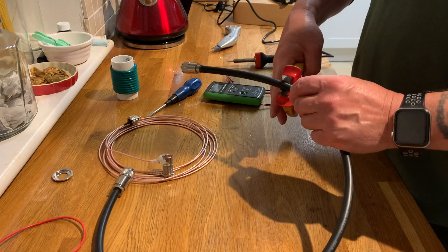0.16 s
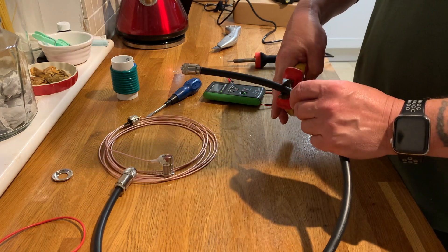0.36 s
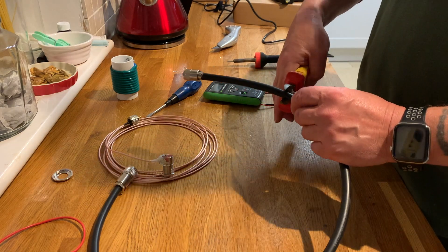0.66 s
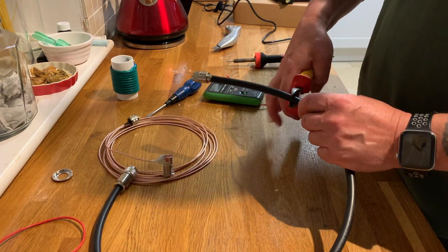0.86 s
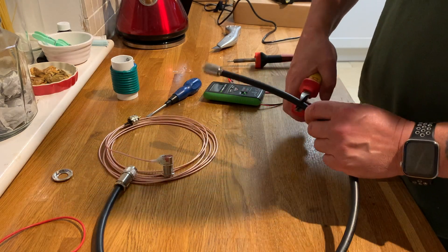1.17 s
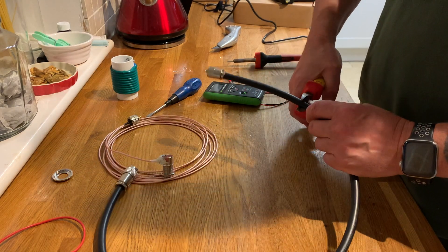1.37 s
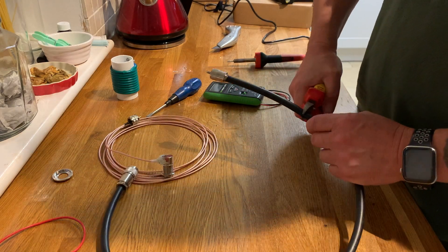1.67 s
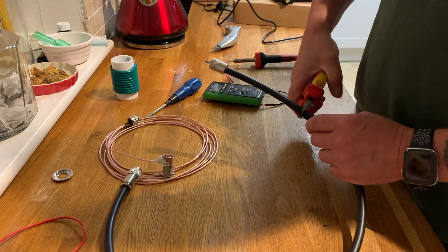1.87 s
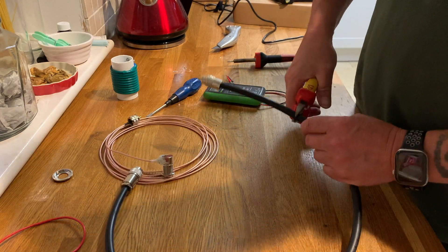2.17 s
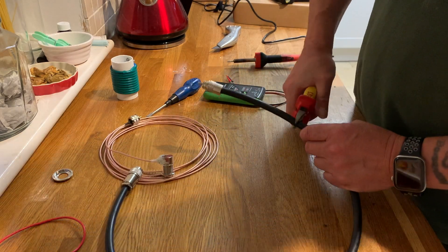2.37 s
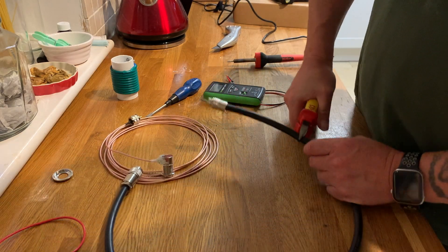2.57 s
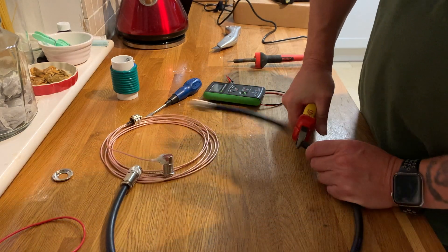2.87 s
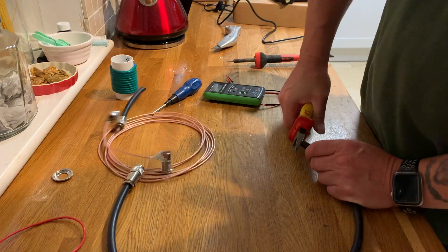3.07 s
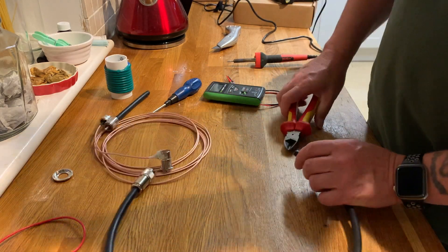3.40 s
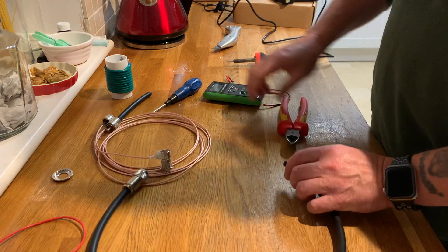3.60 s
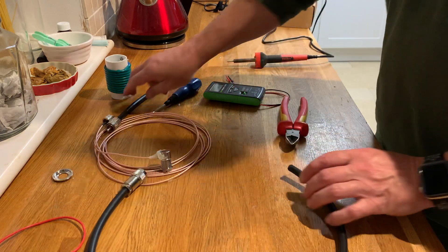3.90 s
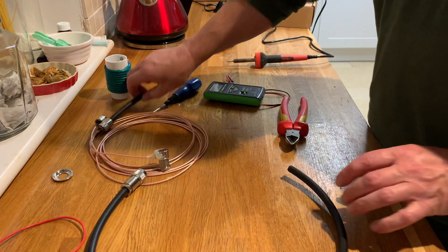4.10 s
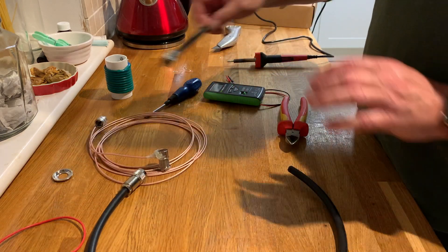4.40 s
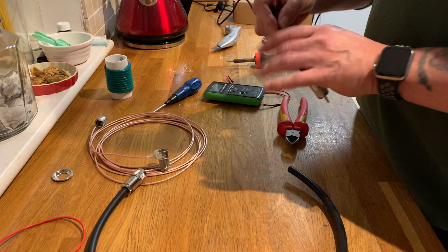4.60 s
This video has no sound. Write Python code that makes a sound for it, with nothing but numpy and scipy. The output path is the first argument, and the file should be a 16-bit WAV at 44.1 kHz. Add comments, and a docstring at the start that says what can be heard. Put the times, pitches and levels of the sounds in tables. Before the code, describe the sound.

Quiet handling with thin metallic tinkles leads to a crunch of cable jacket halfway through the first half. A run of small cracks builds into a hard, steely snap, followed at once by high ringing and light clatter. Soft fumbling ends in a solid knock on wood with a small bounce, then a light pick-up rattle and last tinkles. Close, dry kitchen sound with short reflections and faint room tone.

```python
"""Faint ticks of braid and the jingle of a loose plug nut come first, as side cutters grip a thick coaxial cable.
The jacket crunches and cracks (slip grains, noise bursts), and the core snaps and rings the steel jaws (damped modes).
The offcut flies off onto a coil of wire, the cutters are put down with a knock and the offcut is picked up again.
Blows excite the modes of a wooden kitchen worktop; diffuse echoes and a faint room tone surround it all."""
import sys
import numpy as np
from scipy import signal
from scipy.fft import rfft, irfft
from scipy.io import wavfile

SR = 44100
rng = np.random.default_rng(int(sys.argv[2]) if len(sys.argv) > 2 else 0)


def to_wav(s):
    """Save 16-bit WAV."""
    ch = np.atleast_2d(s).T  # columns
    pcm = np.round(np.clip(ch, -1, 1) * 32767)  # PCM
    wavfile.write(sys.argv[1], SR, pcm.astype(np.int16))


N = 209386
TIME = np.arange(N) / SR
HIT = TIME[:SR // 2]   # time axis of one impact and its decay

# the cable is gripped, bent or squeezed: (t/s at full force, relative level/dB, build-up/s, hold/s)
SQUEEZES = [(.015, -52.5, .02, 0.011), (.75, -61.5, 0.16, 0.055), (.86, -62, 0.015, 0.014),
            (.93, -60, 0.026, 0.01), (1.03, -61, .04, .01), (1.52, -38.5, 0.062, 0.089),
            (1.88, -58.5, 0.24, 0.011), (2.07, -51, 0.045, 0.024), (2.43, -51.5, 0.39, 0.31),
            (2.84, -24.5, 0.022, .005), (3.0, -46, 0.12, 0.23), (4.01, -36, 0.048, 0.0087)]
SQUEEZE_RELEASE_S = 0.024   # time to fall by STROKE_RANGE_DB
# spectrum of the crunching jacket: (f/Hz, relative level/dB per Hz)
CRUNCH_COLOUR = [(150, -22), (450, 1.5), (1000, -1), (2200, -3.5), (4200, -1.5), (6500, -7), (8500, -13),
                 (11500, -10), (13500, -22), (16000, -25.5)]
# the plastic jacket cracks under the jaws: (t/s, relative level/dB)
CRACKS = [(1.5225, -18.5), (1.530, -19.5), (2.068, -40.5), (2.682, -29), (2.820, -36)]
# spectrum of a crack: (f/Hz, relative level/dB per Hz)
CRACK_COLOUR = [(150, -19), (400, 2.5), (1000, 1), (2200, 4.5), (4200, -6), (6500, -23), (15500, -23.5)]
# the jaws break through braid and core: (t/s, relative level/dB)
SNAPS = [(2.322, -33.5), (2.349, -37), (2.387, -33), (2.431, -25), (2.47, -31.5), (2.728, -30.5),
         (2.758, -40), (2.789, -36), (2.842, -21.5), (2.85, 8), (2.8533, 4.5), (2.863, -3)]
# spectrum of a snap: (f/Hz, relative level/dB per Hz)
SNAP_COLOUR = [(200, -8.5), (900, -5.5), (1500, -0.5), (2500, -1), (3600, 2.5), (5200, -0.5), (8500, -5),
               (11000, -3.5), (15500, -11)]
# steel modes of the cutters: (f/Hz, relative level/dB, t60/s before damping)
JAWS = [(1330, -23.5, 0.039), (2444, -3.5, 0.13), (3230, -14, 0.1), (3643, -4, 0.48), (3728, -9, 0.05),
        (3850, -4, 0.19), (4590, -12, 0.83), (5800, -9, 0.031)]
# single strands of braid tick on the blades: (t/s, relative level/dB)
STRAND_TICKS = [(0.011, -22), (0.0408, -19.5), (1.3796, -9), (1.3987, -7), (1.4533, -14), (1.5744, 0.5),
                (2.1365, -18), (2.1807, -17), (2.199, -12), (2.2245, -25), (2.2485, -12.5)]
# spectrum of a strand tick: (f/Hz, relative level/dB per Hz)
STRAND_COLOUR = [(1500, -12), (5000, -13), (10000, 3), (15500, 8.5)]


def cutters(crunch_db=-5.0, snap_db=-10.5, crack_db=-10.0, strand_db=-19.5, jaw_db=-14.0):
    """Fracture: slips crunch in the jacket, cracks and strands burst, and snaps excite the modes of the steel."""
    slips = grains(per_s=960, spread_db=1.5)
    crunch = coloured(slips * strokes(SQUEEZES, SQUEEZE_RELEASE_S), CRUNCH_COLOUR)
    cracks = from_db(crack_db) * bursts(CRACKS, CRACK_COLOUR, t60=0.065)
    snaps = from_db(snap_db) * bursts(SNAPS, SNAP_COLOUR, t60=0.023)
    for s, db in SNAPS:
        steel = struck(JAWS, damping=0.1, scatter_db=0.5)
        add(snaps, s, from_db(db + jaw_db) * steel)
    strands = from_db(strand_db) * bursts(STRAND_TICKS, STRAND_COLOUR, t60=0.0096)
    return from_db(crunch_db) * crunch + cracks + snaps + strands


# the nut's ring modes while it rests on the plug: (f/Hz before detuning, t60/s)
NUT_MODES = [(6890, 0.11), (10215, 0.074), (14460, .05)]
# a jolt sets the nut rattling: (t/s, nominal length/s, last touch against the first level/dB,
# lower mode level/dB, upper mode level/dB, tick level/dB)
JINGLES = [(0.1145, .005, 1.5, -57.5, -43, -34), (0.74, 0.0076, -1, -51.5, -63, -35),
           (0.824, 0.028, 6.5, -54.5, -70, -35.5), (0.9986, 0.0054, -10, -52.5, -46, -30),
           (1.0244, 0.0064, 0, -42.5, -51, -20.5), (1.1438, 0.027, 4.5, -30, -28.5, -20.5),
           (1.467, .02, 7.5, -26, -27, -52), (1.7148, .016, -3, -43, -33, -22),
           (1.8424, .038, 1, -29, -23.5, -24.5), (2.082, 0.0095, 6.5, -54, -72, -34),
           (2.641, .022, -9.5, -29.5, -28.5, -31.5), (2.849, 0.013, 1, -6, -3.5, 4),
           (2.9827, 0.0072, -2.5, -1, -7, 2.5), (3.053, 0.11, -4.5, -26, -21, -22.5),
           (3.254, 0.0035, -11.5, -24, -12.5, -9), (3.359, 0.0054, -4, -39, -28, -19),
           (3.4445, 0.033, -11.5, -34.5, -20, -7.5), (3.994, .005, -1, -29, -29.5, -34),
           (4.0148, 0.0033, -7.5, -41, -18.5, -31), (4.255, 0.029, 19, -49.5, -50.5, -49.5),
           (4.4199, 0.0066, -3, -38.5, -36.5, -41.5), (4.6135, 0.045, 2, -27, -33, -19),
           (4.67, 0.0054, -7, -23, -24, -4)]
REBOUND_S = .017   # largest mean gap between two touches of a rattle
# the nut swings free and rings on: (t/s, beats per s, t60/s, lower, upper and top mode level/dB)
FREE_RINGS = [(1.905, 14, 0.085, -51, -9, -70), (2.893, 22, .14, -9, 5.5, -51.5),
              (2.984, 5, 0.48, -23, -22, -13.5), (3.258, 16, 0.19, -50.5, -33.5, -30.5),
              (3.997, 5.8, 0.27, -49, -52, -39)]
# spectrum of the nut's ticks: (f/Hz, relative level/dB per Hz)
NUT_TICK_COLOUR = [(900, -12), (1900, 9), (5000, -2.5), (7000, 19.5), (8500, -11.5), (10500, 21.5),
                   (12000, -5.5), (13300, -21), (15500, -23.5)]


def plug_nut(detune=0.0042, ring_waver=0.54, low_cut_hz=700):
    """Modal ringing: each touch seats the nut differently and shifts its modes; swinging free, split pairs beat."""
    ringing, force = np.zeros(N), np.zeros(N)
    for start, length_s, swell_db, lower, upper, tick in JINGLES:
        length_s = abs(length_s)
        count = 2 + int(length_s / REBOUND_S)
        for after_s, touch_db in rebounds(length_s, count=count, swell_db=swell_db):
            touch = chatter(per_s=2500, t60=.065, bounce_db=4.0)
            add(force, start + after_s, from_db(tick + touch_db) * touch)
            for (hz, t60), db in zip(NUT_MODES, [lower, upper]):
                shifted_hz = hz * (1 + detune * rng.standard_normal())
                single = mode(shifted_hz, t60)[:len(touch)]
                # chattered ring, as strong as a single strike
                ring = rms_one(signal.fftconvolve(touch, single)[:len(touch)]) * np.std(single)
                add(ringing, start + after_s, from_db(db + touch_db) * ring)
    for s, beats, t60, *mode_db in FREE_RINGS:
        beating = np.sin(np.pi * beats * HIT) ** 2
        for (hz, _), db in zip(NUT_MODES, mode_db):
            ring = mode(hz, t60) * beating * waver(depth=ring_waver, rate_hz=53)
            add(ringing, s, from_db(db) * ring)
    # so small a part radiates no bass
    low_cut = signal.butter(2, low_cut_hz, "high", fs=SR, output="sos")
    return ringing + signal.sosfilt(low_cut, coloured(force, NUT_TICK_COLOUR))


# hands, cable and cutters meet the worktop; blows towards its left reach the right port later:
# (t/s, knock level/dB, thump level/dB, thump tilt/dB per octave, contact click level/dB, right port delay/s)
KNOCKS = [(1.35, -46, -47.5, 0, -71, .0002), (1.386, -52, -49, 8, -52.5, .0002),
          (2.589, -27.5, -23.5, 1.5, -29, .00025), (2.682, -27, -35, -5.5, -38, 0),
          (2.819, -28, -43, 2, -33.5, 0), (2.85, -29.5, -22, 5, -16.5, .0002),
          (2.986, -22, -38, 3.5, -22.5, .00025), (3.039, -28, -46.5, 3.5, -16.5, .00025),
          (3.096, -23, -38.5, 5.5, -20.5, .00025), (3.164, -25, -37.5, 11, -39.5, .00025),
          (3.368, -16, -22.5, 6.5, -47, 0), (3.435, -14.5, -28.5, 3, -38.5, 0),
          (3.444, -8.5, -17, 1, -26.5, .00006), (3.522, 8, -11.5, 1.5, -2, -.0001),
          (3.578, -4.5, -15, -5, -14.5, -.0003), (3.941, -33, -23.5, 3.5, -41, .00027),
          (4.015, -37.5, -52, -2, -22.5, .0001)]
# modes of the slab as a whole: (f/Hz, relative level/dB, t60/s before damping)
SLAB = [(57.3, -8, 0.34), (77.7, -6, 0.3), (79, -5.5, 0.36), (100, -8.5, 0.29), (141.3, -8.5, 0.098),
        (162.3, -8, 0.11), (211, -14.5, 0.086)]
# modes of the wood around the blow: (f/Hz, relative level/dB, t60/s before damping)
WOOD = [(230, -15.5, 0.073), (301, 2.5, 0.33), (347.4, -2.5, 0.54), (385, 2.5, 0.49), (447.6, -1.5, 0.41),
        (530, -7.5, 0.28), (548.3, 0.5, 0.39), (687.2, 3, 0.41), (768, 0.5, 0.23), (840, -2.5, 0.23),
        (920, -2.5, 0.27), (973, -2, 0.22), (1170, -11, 0.1), (1310, -13.5, 0.11), (1569, -12.5, 0.14),
        (1790, -20.5, 0.15)]
# spectrum of the contact click: (f/Hz, relative level/dB per Hz)
CLICK_COLOUR = [(120, -0.5), (300, 8), (900, 3), (1500, 2.5), (2300, -1.5), (3200, -11), (6500, -10.5),
                (8500, -20.5), (11000, -9.5), (13500, -29.5), (16000, -26)]
# every blow settles in two bounces: nominal time to the last, its level against the blow
BOUNCE_S, BOUNCE_DB = .036, -29.5
# the cable or the cutters drag over the wood; at 3.515 s the noise burst of the cutters being put down:
# (t/s at full force, relative level/dB, build-up/s, hold/s)
RUBS = [(2.32, -56, 0.23, 0.23), (2.75, -46.5, 0.21, 0.086), (3.05, -30, 0.11, 0.19),
        (3.515, -16.5, 0.03, .005), (4.01, -35, 0.044, 0.043)]
RUB_RELEASE_S = 0.051   # time to fall by STROKE_RANGE_DB
# spectrum of the dragging and of the put-down burst: (f/Hz, relative level/dB per Hz)
RUB_COLOUR = [(29, -48), (50, -21), (177, -2), (319, -17.5), (454, -2.5), (555, -9.5), (600, -5.5),
              (1080, -18), (2000, -26.5), (2600, -44), (4400, -120)]


def worktop(knock_db=-6.5, thump_db=0.0, click_db=0.0, low_cut_hz=48, tilt_share=0.47, firm_click_db=-14.0,
            rub_db=-5.5):
    """Modal excitation: blows ring the wood, bounce and rock the slab; grains give drags and a put-down burst."""
    out = np.zeros((2, N))   # left and right port
    for s, knock, thump, thump_tilt_db, click, lag_s in KNOCKS:
        # a soft contact has little click and hardly reaches the high modes
        tilt_db = np.clip(tilt_share * (click - knock - firm_click_db), -5, 2)
        blow = np.zeros(N)
        slab = struck(SLAB, damping=0.9, scatter_db=5.0, tilt_db=thump_tilt_db)
        add(blow, 0, from_db(thump + thump_db) * slab)
        for after_s, bounce_db in rebounds(BOUNCE_S, count=3, swell_db=BOUNCE_DB):
            wood = from_db(knock + knock_db) * struck(WOOD, damping=.26, scatter_db=1.0, tilt_db=tilt_db)
            contact = from_db(click + click_db) * coloured(burst(t60=0.034), CLICK_COLOUR)
            add(blow, after_s, from_db(bounce_db) * (wood + contact))
        add(out[0], s, blow)
        add(out[1], s + lag_s, blow)
    slips = grains(per_s=340, spread_db=2.5)
    rub = coloured(slips * strokes(RUBS, RUB_RELEASE_S), RUB_COLOUR)
    out += from_db(rub_db) * ports(rub, lag_s=.0002, pan_db=2.6)
    # the slab radiates poorly below its lowest mode
    low_cut = signal.butter(4, low_cut_hz, "high", fs=SR, output="sos")
    return signal.sosfilt(low_cut, out)


# decay of the kitchen: (f/Hz, t60/s)
ROOM_T60 = [(80, 0.49), (500, 0.3173), (3000, 0.4023), (7000, 0.28), (14000, 0.36)]
# reverberant level against the sound sent into the room: (f/Hz, level/dB)
ROOM_DB = [(60, -10.5), (200, -3), (600, -1), (3000, 1.5), (7000, -4.5), (14000, -10)]


def kitchen(x, first_echo_s=0.001, build_s=0.00095):
    """Diffuse reverberation: echoes build up after the direct sound and die away band by band."""
    onset = 1 - np.exp(-np.maximum(HIT - first_echo_s, 0) / build_s)
    response = 0
    for hz, band in diffuse_bands(size=len(HIT)):
        envelope = onset * dying(at_hz(ROOM_T60, hz))
        unit_energy = envelope / np.sqrt(np.sum(envelope ** 2))
        response = response + from_db(at_hz(ROOM_DB, hz)) * band * unit_energy
    return signal.fftconvolve(x[None], response, axes=1)[:, :N]


# spectrum of the room tone: (f/Hz, relative level/dB per Hz)
FLOOR = [(26, -34), (45, -1.5), (174, -12.5), (314, -16), (401, -16), (566, -18), (818, -22), (7650, -33.5),
         (8450, -32), (16000, -30)]
FLOOR_DB = -64.5   # overall rms level


def room_tone():
    """Stationary diffuse noise: a faint steady rumble and hiss."""
    noise = sum(from_db(at_hz(FLOOR, hz)) * band for hz, band in diffuse_bands(size=N))
    return from_db(FLOOR_DB) * rms_one(noise)


# left-right likeness of diffuse sound: (f/Hz, correlation)
LIKENESS = [(60, 0.55), (150, 1), (400, 0.17), (1000, 0), (15000, 0.073)]


def diffuse_bands(size):
    """Spatial coherence: half-octave bands of stereo noise that add up to about white: (centre f/Hz, band)."""
    edges = np.geomspace(20, 19000, 21)
    white = rng.standard_normal((2, 2, size + SR // 4))
    for k, (low, high) in enumerate(zip(edges, edges[1:])):
        band_pass = signal.butter(2, [low, high], "band", fs=SR, output="sos")
        # neighbouring bands take independent noise; the filter's start is dropped
        mid, side = signal.sosfilt(band_pass, white[k % 2])[:, -size:]
        hz = np.sqrt(low * high)
        alike = np.clip(at_hz(LIKENESS, hz), -1, 1)
        yield hz, np.sqrt((1 + alike) / 2) * mid + np.sqrt((1 - alike) / 2) * side * [[1], [-1]]


def struck(modes, damping, scatter_db, tilt_db=0):
    """Modal superposition: modes of random strength and sign, tilted by tilt_db an octave; unit power at the start."""
    hz, db, t60 = np.transpose(modes)
    gains = from_db(db + tilt_db * np.log2(hz) + scatter_db * rng.standard_normal(len(hz)))
    gains *= rng.choice([-1, 1], len(hz)) / np.sqrt(np.sum(gains ** 2) / 2)
    return sum(g * mode(f, damping * t) for g, f, t in zip(gains, hz, t60))


def mode(hz, t60):
    """Damped oscillation: a struck mode, a sine under an envelope that starts at 1."""
    return np.sin(2 * np.pi * hz * HIT) * dying(t60)


def dying(t60):
    """Exponential decay: an envelope that falls 60 dB in t60 seconds."""
    return from_db(-60 * HIT / t60)


def burst(t60):
    """Impulsive contact: decaying noise with the power of its envelope."""
    envelope = dying(t60)
    return rms_one(rng.standard_normal(len(HIT)) * envelope) * np.sqrt(np.mean(envelope ** 2))


def bursts(rows, colour, t60):
    """Source and filter: each contact is one burst, all given the same colour."""
    force = np.zeros(N)
    for s, db in rows:
        add(force, s, from_db(db) * burst(t60))
    return coloured(force, colour)


def chatter(per_s, t60, bounce_db):
    """Repeated impact: a loose part hits once, then bounces finely as it settles; about unit energy."""
    bounces = rng.standard_normal(len(HIT)) * (rng.random(len(HIT)) < per_s / SR) * dying(t60)
    force = from_db(bounce_db) * bounces / np.sqrt(np.sum(bounces ** 2) + 1e-12)
    force[0] += 1
    return force[:SR // 4] / np.sqrt(np.sum(force ** 2))


def rebounds(length_s, count, swell_db, uneven=.15):
    """Rebound: contacts at uneven gaps, growing or fading: (t/s after the first, level/dB against it)."""
    along = np.linspace(0, 1, count)
    jitter = 1 + uneven * rng.uniform(-1, 1, count) / (count - 1)
    return zip(length_s * along * jitter, swell_db * along)


def grains(per_s, spread_db):
    """Stick-slip: random tiny slips of uneven size and either sign; rms 1."""
    sizes = from_db(spread_db * np.minimum(rng.exponential(1, N), 4)) * rng.choice([-1, 1], N)
    return rms_one(sizes * (rng.random(N) < per_s / SR))


STROKE_RANGE_DB = 20   # level change over one build-up or release time


def strokes(rows, release_s):
    """Amplitude envelope: the force of each stroke builds up, holds and eases off, linearly in dB."""
    force = np.zeros(N)
    for s, db, build_s, hold_s in rows:
        before = np.maximum(s - TIME, 0) / max(build_s, 1e-3)
        after = np.maximum(TIME - s - hold_s, 0) / release_s
        force += from_db(db - STROKE_RANGE_DB * (before + after))
    return force


def waver(depth, rate_hz):
    """Amplitude modulation: a random gain around 1, low-passed at rate_hz."""
    low_pass = signal.butter(2, rate_hz, fs=SR, output="sos")
    noise = signal.sosfilt(low_pass, rng.standard_normal(SR))
    return 1 + depth * rms_one(noise[-len(HIT):])


def ports(x, lag_s, pan_db):
    """Time and level differences: the right port hears x lag_s later (negative: earlier) and pan_db weaker."""
    size = 2 ** 18   # longer than the sound
    phase_shift = np.exp(-2j * np.pi * np.fft.rfftfreq(size, 1 / SR) * lag_s)
    late = irfft(rfft(x, size) * phase_shift)[:N]
    return np.array([x * from_db(pan_db / 2), late * from_db(-pan_db / 2)])


def coloured(x, colour, size=2048):
    """Minimum-phase filtering: causal, of unit power gain, with the given spectrum."""
    gain = from_db(at_hz(colour, np.linspace(0, SR / 2, size + 1)))
    cepstrum = irfft(np.log(rms_one(gain)))
    # folding the cepstrum onto positive time makes the filter causal
    cepstrum[1:size] *= 2
    cepstrum[size + 1:] = 0
    return signal.fftconvolve(x, irfft(np.exp(rfft(cepstrum))))[:len(x)]


def at_hz(points, hz):
    """Logarithmic frequency scale: interpolate a table along it."""
    f, value = np.transpose(points)
    return np.interp(np.log(np.maximum(hz, 1)), np.log(f), value)


def from_db(db):
    """Level: decibels to amplitude gain."""
    return 10 ** (np.asarray(db) / 20)


def rms_one(x):
    """Effective value: scale to rms 1."""
    return x / np.sqrt(np.mean(x ** 2) + 1e-20)


def add(track, s, sound):
    """Superposition: mix a sound in at s seconds."""
    at = max(round(s * SR), 0)
    track[at:at + len(sound)] += sound[:N - at]


def scene(plug_room_db=-1.5, cut_room_db=-2.5, table_room_db=-0.5):
    """Superposition of direct sound, reverberation and room tone, with small port differences for plug and cutters."""
    plug, cut, table = plug_nut(), cutters(), worktop()
    direct = ports(plug, lag_s=.000015, pan_db=0.3) + ports(cut, lag_s=-0.000029, pan_db=0.7) + table
    into_room = from_db(plug_room_db) * plug + from_db(cut_room_db) * cut + from_db(table_room_db) * table[0]
    return direct + kitchen(into_room) + room_tone()


CUTOFF_HZ = 17200   # stop-band edge


def record(dry, drive_db=0.0):
    """Clipping and band limiting: peaks beyond full scale are clipped, then the top is cut."""
    top_cut = signal.cheby2(14, 70, CUTOFF_HZ, fs=SR, output="sos")
    return signal.sosfilt(top_cut, np.clip(from_db(drive_db) * dry, -1, 1))


dry = scene()
out = record(dry)
to_wav(out)
```